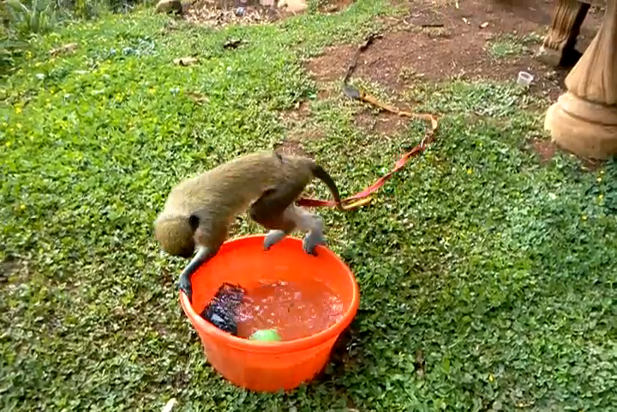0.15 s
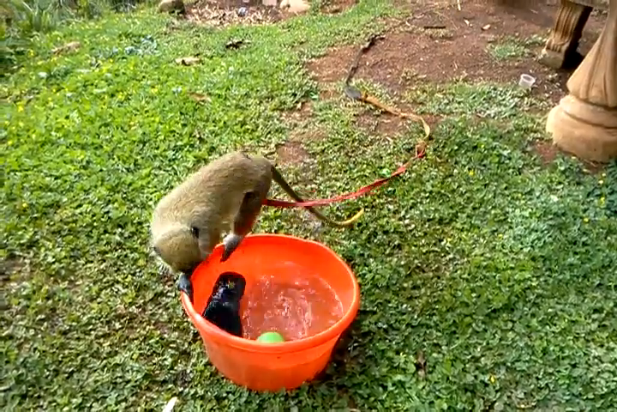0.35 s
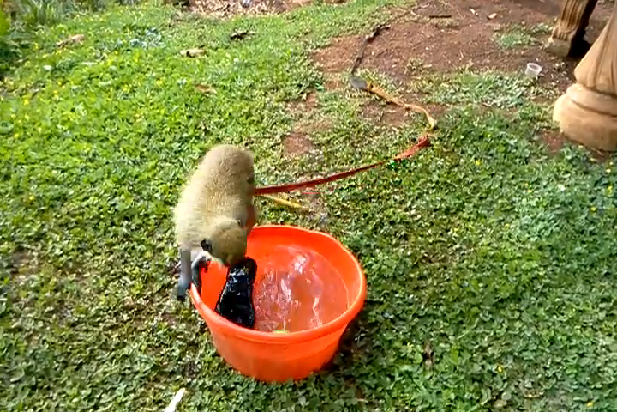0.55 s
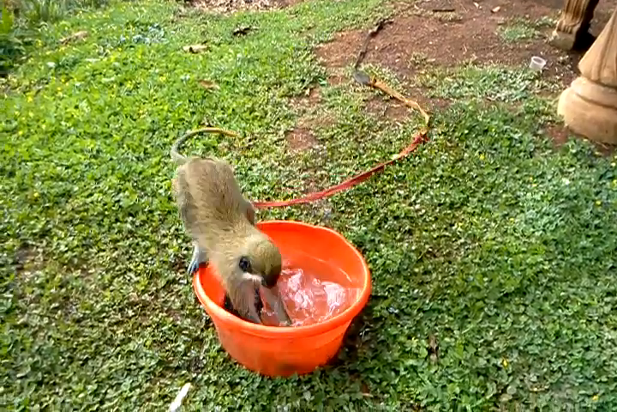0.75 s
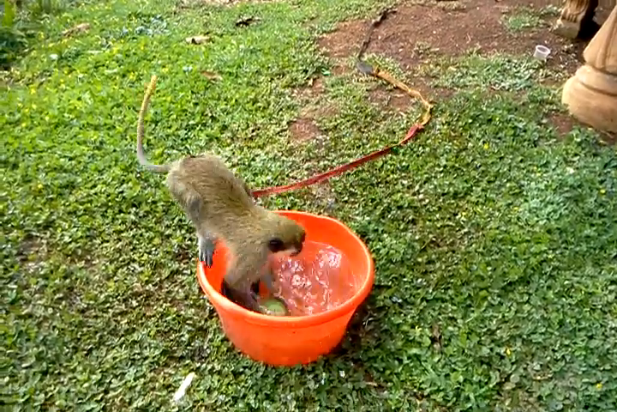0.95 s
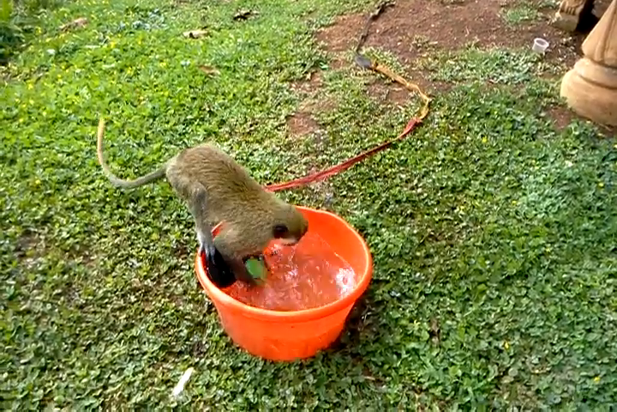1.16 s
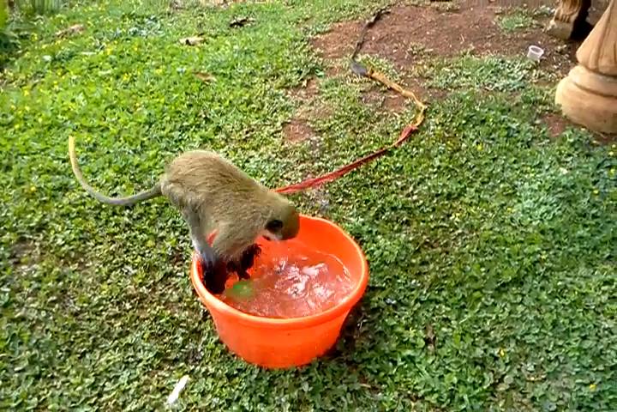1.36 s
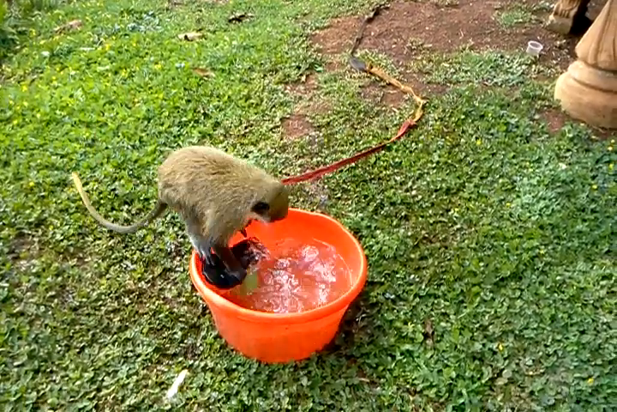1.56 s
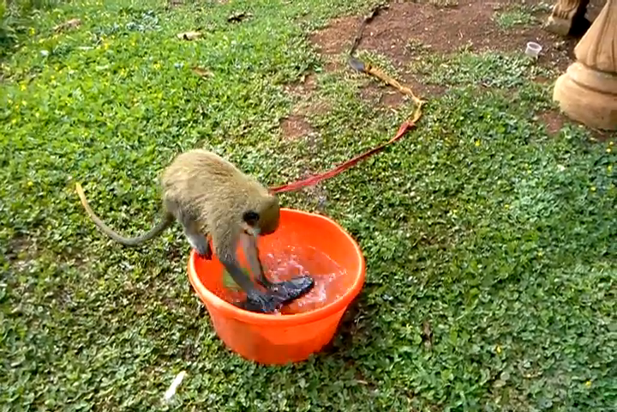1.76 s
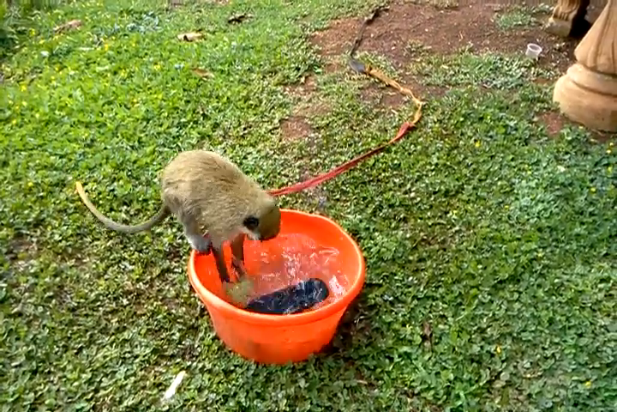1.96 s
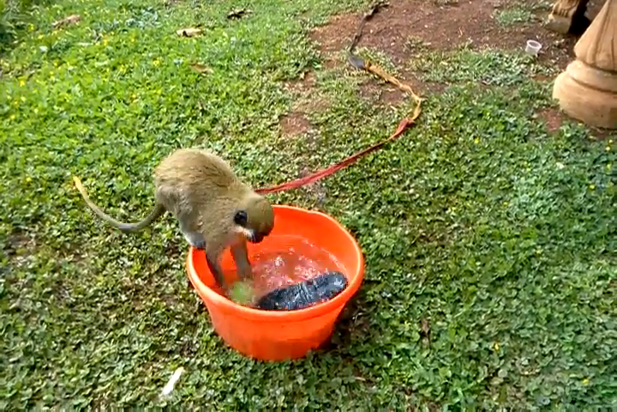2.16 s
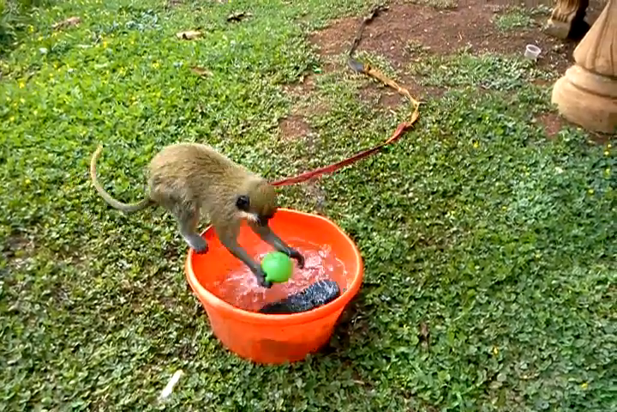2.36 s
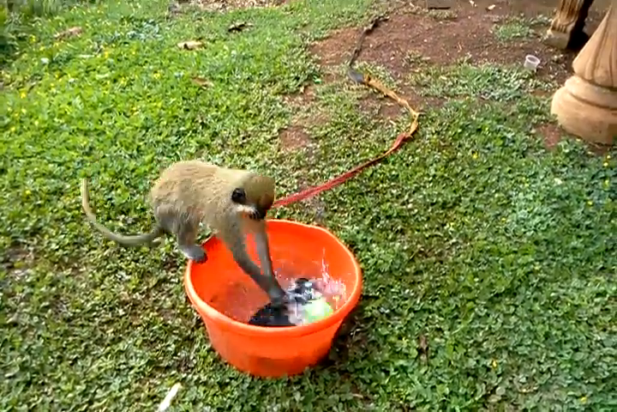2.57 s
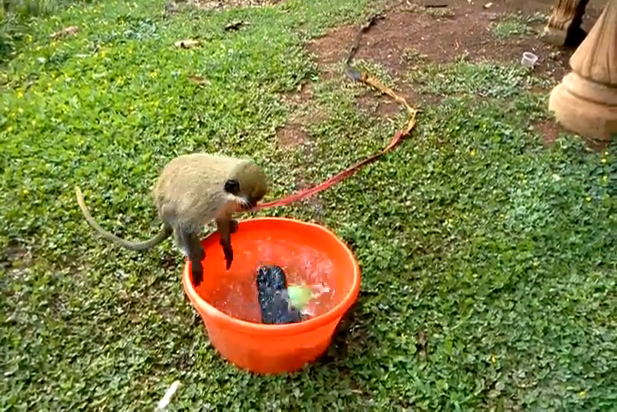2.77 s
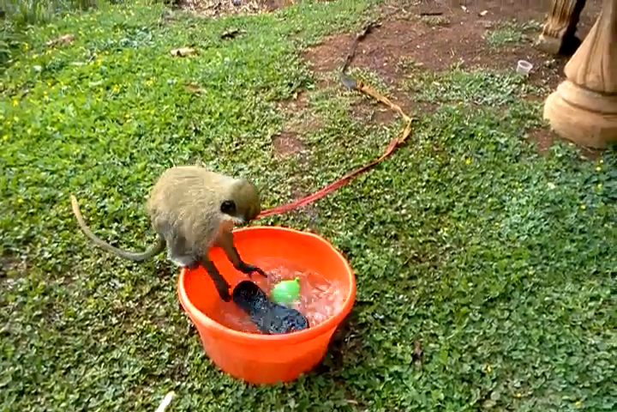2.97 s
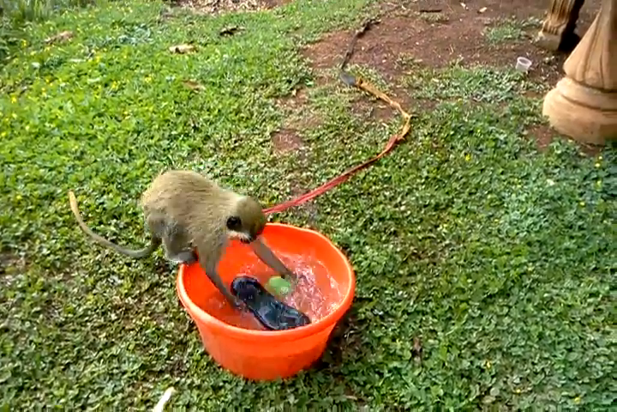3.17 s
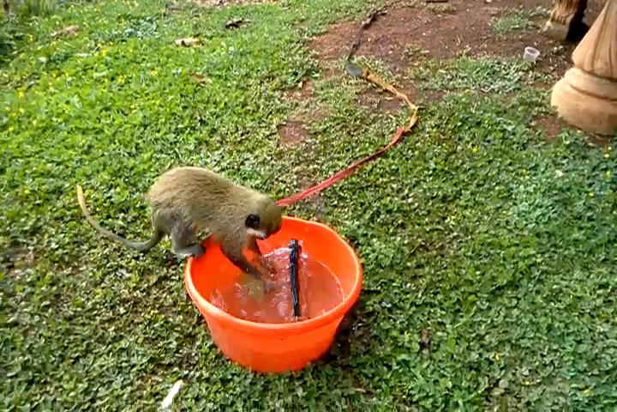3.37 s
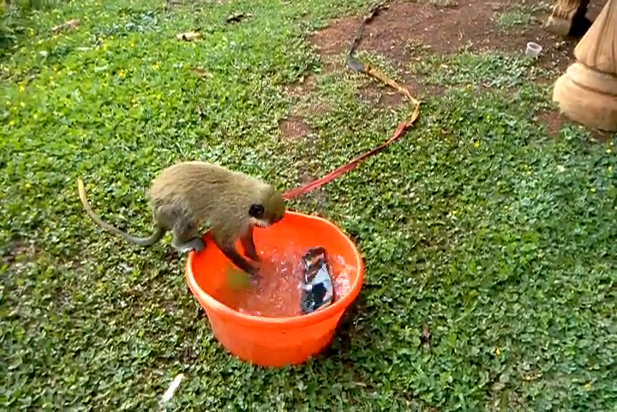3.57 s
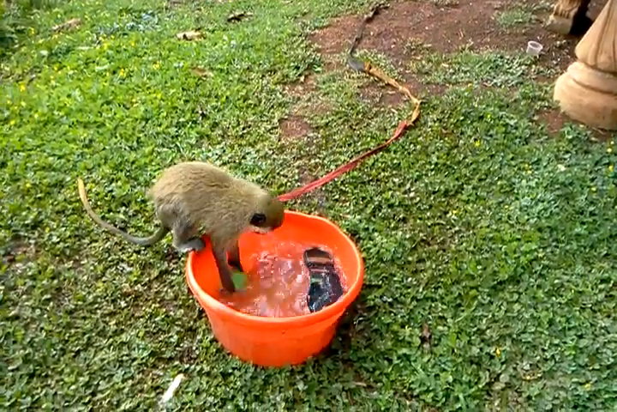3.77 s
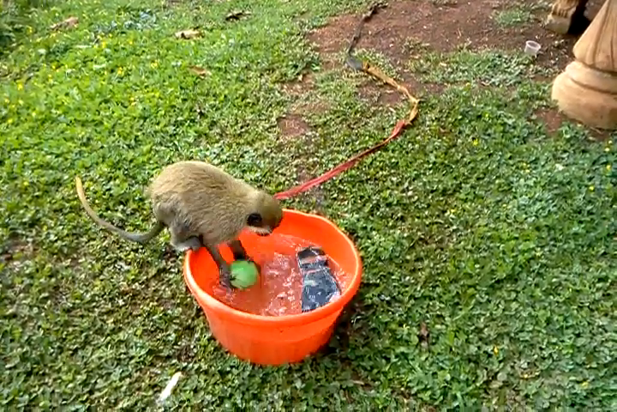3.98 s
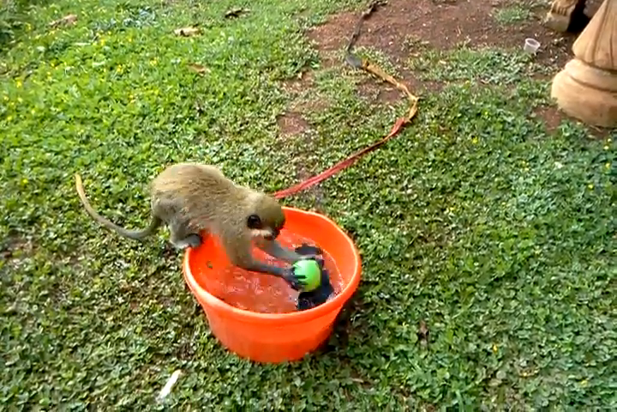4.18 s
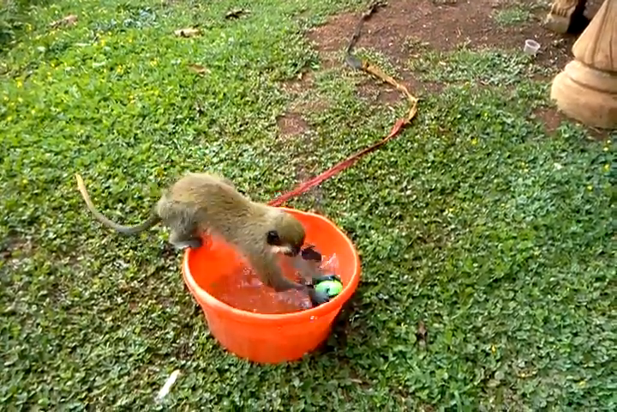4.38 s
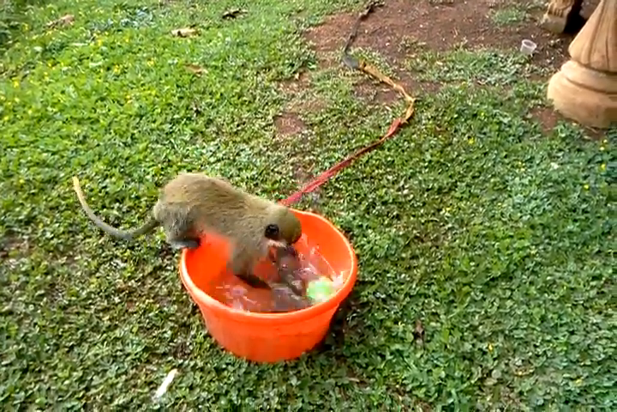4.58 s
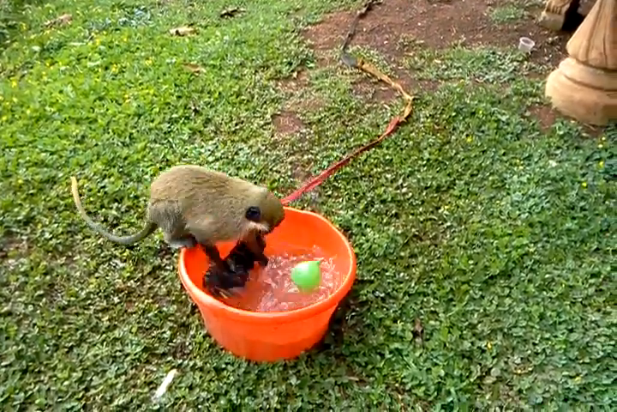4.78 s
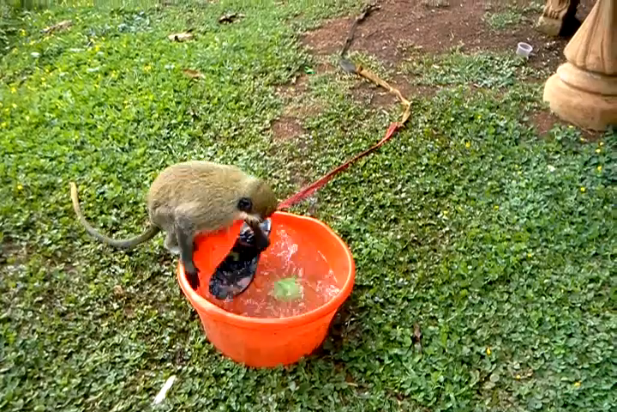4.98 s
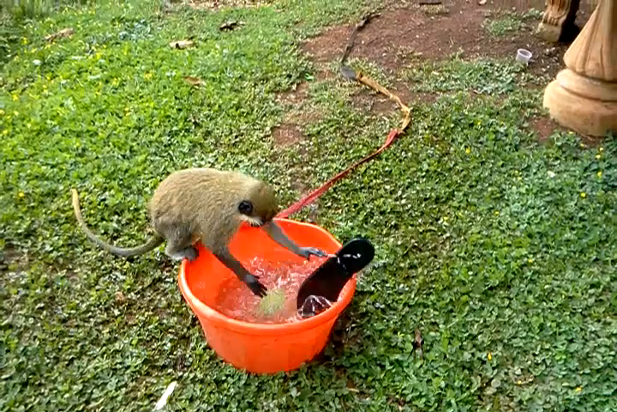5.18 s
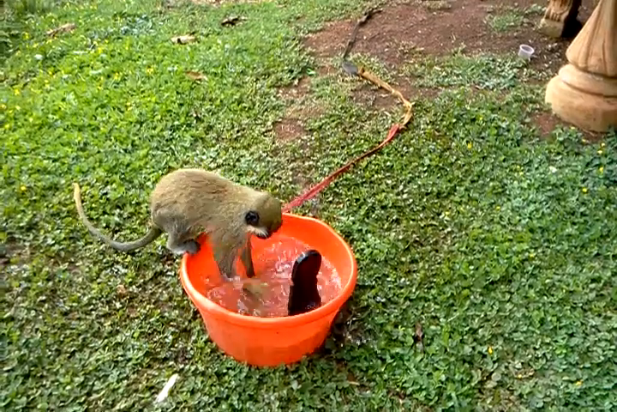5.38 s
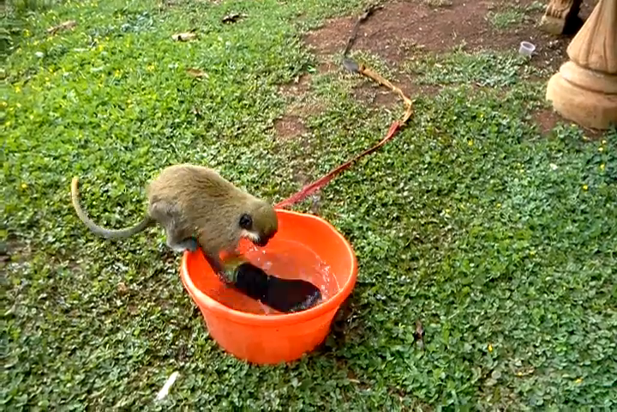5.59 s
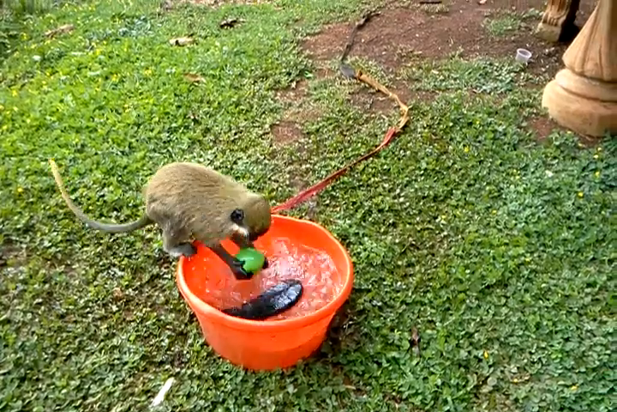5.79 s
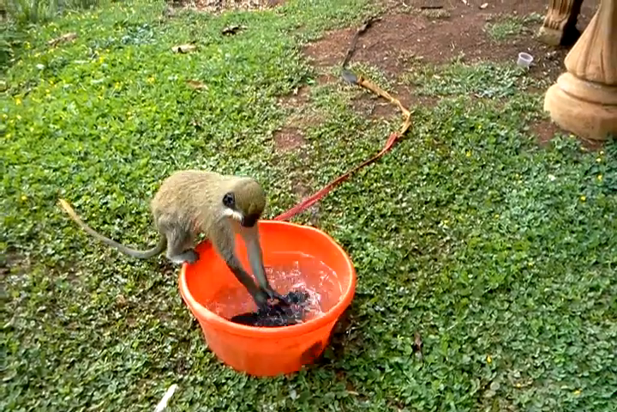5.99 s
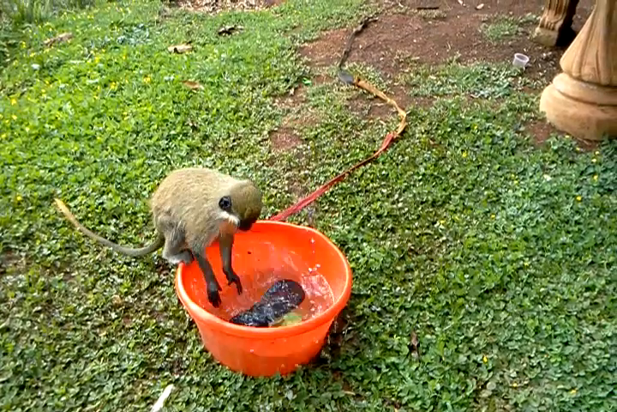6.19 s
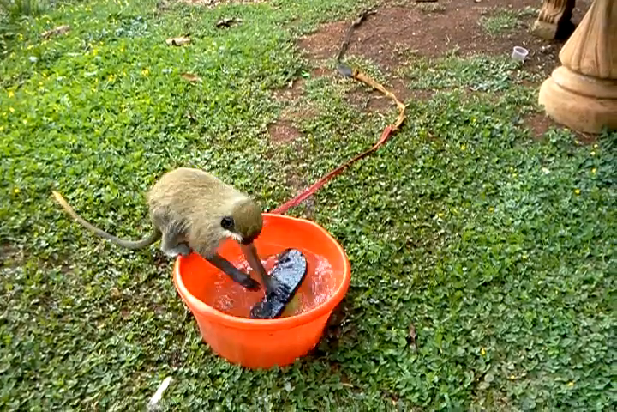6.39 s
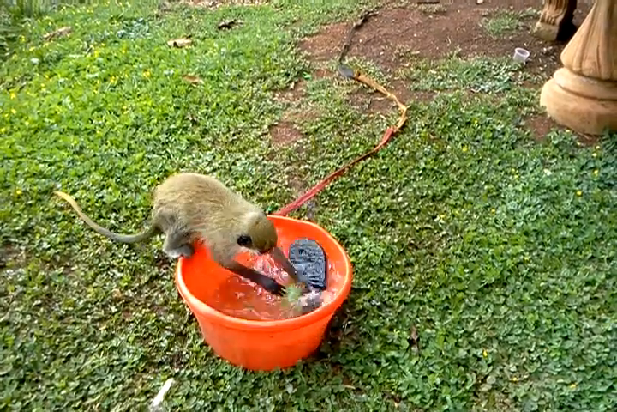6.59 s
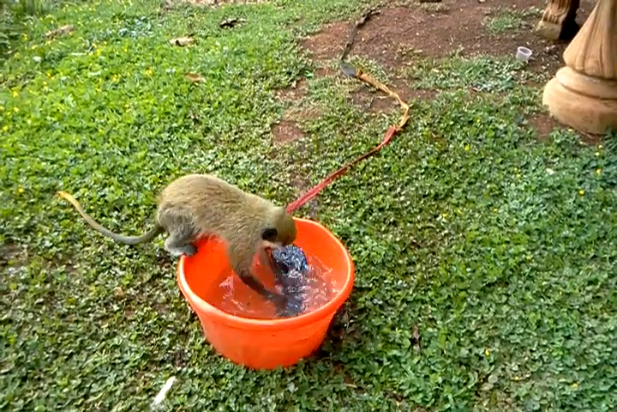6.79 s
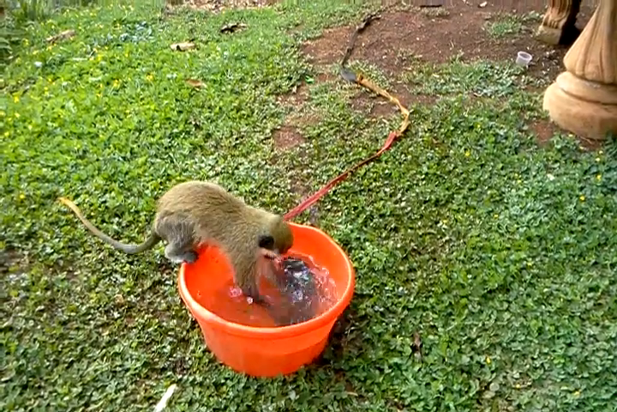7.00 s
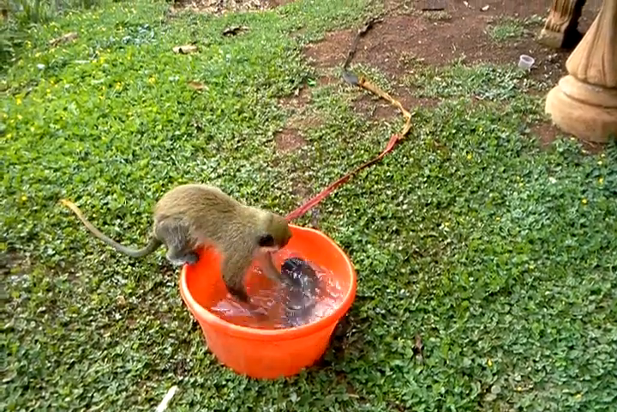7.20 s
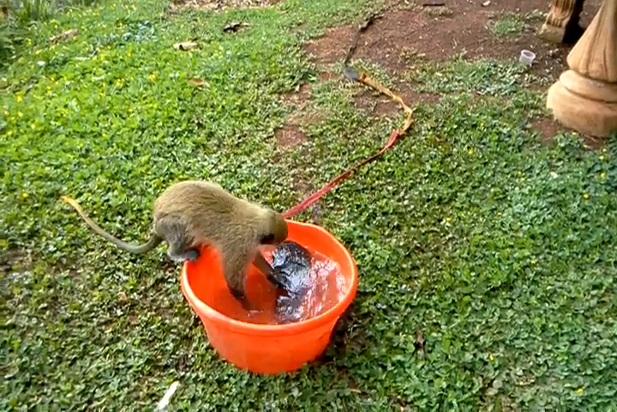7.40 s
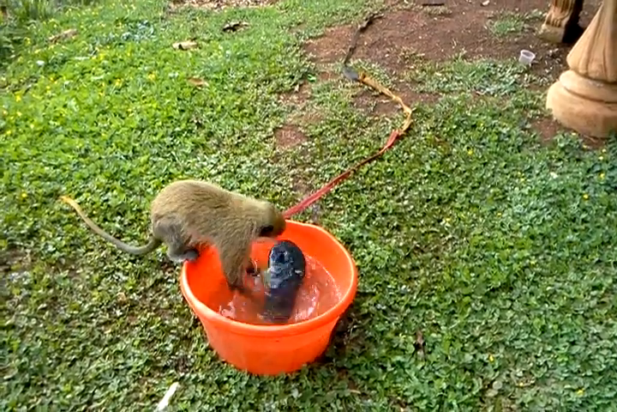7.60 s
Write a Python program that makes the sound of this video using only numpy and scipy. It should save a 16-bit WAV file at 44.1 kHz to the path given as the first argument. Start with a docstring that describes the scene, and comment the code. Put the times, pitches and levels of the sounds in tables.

```python
"""A far propeller plane swells in over garden hiss and a thin cricket: sinking tones and comb-swept noise.
From 0.7 s a small monkey paddles after a ball and a sandal in a plastic tub on a lawn: strokes throw
spray of tiny ringing bubbles, drops plink, trapped air gurgles up, and short echoes give the tub.
A long gust, shaped low noise with slow eddies, bumps the microphone from 2.7 s, with puffs around it.
The water settles after 6.9 s; near 7.5 s a far bird sounds one faint, wavering sine note."""
import sys
import numpy as np
from scipy import signal
from scipy.fft import rfft, irfft, next_fast_len
from scipy.io import wavfile

SR = 44100
rng = np.random.default_rng(int(sys.argv[2]) if len(sys.argv) > 2 else 0)


def dump(signal):
    """Clip the signal to [-1, 1] and save it as 16-bit WAV at the path in sys.argv[1]."""
    limited = np.clip(np.atleast_2d(signal).T, -1, 1)
    pcm = np.round(limited * 32767).astype(np.int16)
    wavfile.write(sys.argv[1], SR, pcm)


N = 337356

# Table levels stand ahead of the trims, wavering and tub echo applied in the functions.
# Paw strokes through the water: (time [s], length [s], spray level [dB])
PAW_STROKES = [(0.80, 0.055, -38), (0.895, 0.056, -36), (1.15, 0.028, -39), (1.345, 0.085, -37.5),
               (1.50, 0.041, -40.5), (1.725, 0.095, -39), (1.975, 0.073, -38), (2.425, 0.051, -37),
               (2.51, 0.135, -34.5), (2.69, 0.053, -39.5), (3.215, 0.028, -43), (3.305, 0.049, -40.5),
               (3.465, 0.028, -31.5), (4.22, 0.045, -38.5), (4.355, 0.14, -45), (4.615, 0.11, -39.5),
               (4.855, 0.19, -41), (5.10, 0.14, -40.5), (5.342, 0.023, -34), (5.405, 0.03, -33.5),
               (5.725, 0.045, -37.5), (5.89, 0.14, -38), (6.08, 0.043, -42.5), (6.49, 0.25, -44)]
# Loudest drops and slaps: (time [s], trapped bubble pitch [Hz], ring level [dB], spatter level [dB])
WATER_DROPS = [(0.8047, 6940, -41, -36), (0.8199, 4660, -31.5, -47), (0.909, 4580, -32, -33),
               (0.939, 4200, -33, -48), (1.0628, 3260, -32, -39), (1.1604, 5330, -37, -29.5),
               (1.1797, 4800, -36, -45.5), (1.3853, 3530, -20.5, -22.5), (1.548, 4880, -31.5, -44),
               (1.734, 5030, -32, -34), (1.7588, 4280, -32.5, -46), (1.7923, 5710, -38, -32),
               (1.8032, 3640, -34, -30), (1.9142, 4890, -18.5, -27), (2.0548, 3350, -33, -31),
               (2.164, 4340, -38, -38), (2.515, 4930, -30, -33.5), (2.539, 5120, -24.5, -34),
               (2.584, 4970, -25, -24.5), (2.6089, 5600, -36, -34.5), (2.7442, 4350, -44, -25),
               (3.2315, 5130, -33, -36), (3.3253, 4600, -28.5, -33), (3.3406, 5000, -29.5, -52),
               (3.4903, 5000, -48, -27), (3.547, 4930, -31, -32), (3.6786, 3960, -30.5, -30),
               (4.3627, 5260, -37, -32.5), (4.4504, 3420, -33, -54), (4.4994, 4400, -29.5, -34),
               (4.5285, 4970, -30.5, -42), (4.5898, 5640, -43, -31.5), (4.693, 3130, -35.5, -44),
               (4.859, 5300, -30, -37), (4.8898, 4850, -29, -40), (5.1075, 5160, -42, -32),
               (5.357, 4400, -30.5, -40.5), (5.4566, 5200, -33, -35.5), (5.483, 4700, -41, -38),
               (5.4965, 3710, -37, -28.5), (5.6233, 5000, -29, -37), (5.7648, 4730, -34, -46.5),
               (5.9588, 5030, -28, -33.5), (6.4124, 4670, -36, -34.5), (6.544, 4550, -33, -48),
               (6.7027, 3800, -38.5, -33), (6.85, 5300, -34, -36), (6.9453, 5240, -38, -34.5)]
# Largest air pockets: (time [s], pitch [Hz], level [dB], decay by 60 dB [s], time to rise an octave [s])
AIR_POCKETS = [(0.934, 375, -28, .035, .2), (0.937, 1910, -20.5, 0.0094, .1),
               (1.007, 2090, -26, 0.021, .04), (1.236, 1450, -26, .014, .1),
               (1.423, 1934, -29.5, 0.094, 0.27), (1.732, 1360, -29.5, .03, .1),
               (1.792, 1240, -18.5, 0.016, 0.092), (2.0465, 1810, -17, 0.0089, .1),
               (2.049, 1110, -27.5, 0.018, .1), (3.076, 777, -26.5, 0.2, 0.048),
               (3.285, 980, -26, 0.13, .2), (3.307, 990, -18, .012, .1), (3.308, 763, -27, 0.15, 0.26),
               (3.386, 1000, -24, 0.021, .1), (3.409, 890, -31.5, 0.053, .14),
               (3.444, 1550, -29, 0.038, .1), (3.4635, 1866, -18, 0.033, 0.02),
               (3.482, 1690, -21.5, 0.023, 0.021), (3.494, 775, -23.5, .024, .1),
               (4.0902, 1140, -22.5, 0.021, .11), (4.146, 1430, -29.5, .04, 0.082),
               (4.247, 1976, -31, 0.05, 0.087), (4.624, 277, -29.5, .05, .2), (4.666, 312, -28.5, .06, .2),
               (4.720, 894, -25.5, 0.036, .038), (4.8503, 1780, -12, 0.0065, .09),
               (4.853, 2250, -21, 0.026, .1), (4.918, 1146, -26.5, 0.028, .06),
               (4.973, 820, -31, 0.048, .1), (5.172, 2910, -24.5, .016, .1), (5.205, 1710, -30, 0.035, .03),
               (5.623, 2020, -25.5, 0.015, .14), (5.724, 1610, -30.5, 0.035, .1),
               (6.029, 1240, -27, 0.024, .08), (6.052, 860, -33, 0.037, .1),
               (6.136, 1890, -33, 0.05, 0.098), (6.181, 1500, -30.5, 0.031, .05),
               (6.515, 353, -33, 0.055, .2)]
# Trapped air escaping from under the toys: (time [s], length [s], relative flow [dB])
AIR_ESCAPES = [(0.9, 1.9, -13.5), (3.27, 0.23, 3), (4.08, 0.2, -6.5), (4.6, 0.4, -4.5), (5.35, 0.85, -10.5)]
# Colour of the splashing water: (frequency [Hz], relative level per Hz [dB])
SPRAY_SPECTRUM = [(300, -13.5), (700, -14.5), (1300, -6.5), (1950, -1), (2500, -9.5), (3400, 3),
                  (4100, -2.5), (4950, 4), (6000, -5.5), (7300, -5.5), (8600, -27.5)]
# Propeller tones: (time [s], blade pitch [Hz], blade level [dB], shaft tone an octave below [dB],
# first overtone [dB])
PROPELLER = [(0, 108.3, -63, -52, -55.5), (0.5, 108.2, -54.5, -62, -65), (1.1, 107.9, -43.5, -54, -53),
             (2.0, 106.7, -40, -46, -68), (2.8, 105.2, -39.5, -49, -56), (3.5, 102.7, -38.5, -51, -56),
             (4.0, 100.3, -46, -59, -45.5), (4.7, 96.4, -39, -53, -65), (5.6, 91.4, -42, -66, -65),
             (6.2, 88.8, -40.5, -69, -60), (6.75, 86.6, -37, -51, -54.5), (7.65, 82.7, -38.5, -51, -62)]
# Plane's rush: (time [s], level [dB], treble lift [dB], delay of the ground echo [ms])
PLANE_RUSH = [(0, -47.5, -2.5, 2.95), (0.7, -46, -1.5, 3.4), (1.2, -43, 2.5, 2.1), (2.2, -42, -2.5, 2.7),
              (2.9, -42.5, -4.5, 3.0), (3.8, -41.5, -2.5, 3.1), (4.6, -39.5, -2.5, 3.7),
              (5.1, -40, -7, 3.5), (5.7, -45.5, -4, 3.8), (6.5, -46, -6, 3.1), (7.65, -46, -10.5, 3.0)]
# Colour of the plane's rush: (frequency [Hz], relative level per Hz [dB])
RUSH_SPECTRUM = [(60, -26.5), (150, -3.5), (280, 1), (550, 1), (1000, 0.5), (1500, -7), (2500, -12.5),
                 (5000, -55)]
# One long gust and a few puffs on the microphone: (time [s], length [s], level [dB])
WIND_GUSTS = [(1.60, 0.039, -38.5), (1.89, 0.06, -53), (2.74, 1.42, -39), (3.37, 0.048, -29),
              (3.76, 0.072, -36), (5.18, 0.087, -49), (5.98, 0.14, -42), (6.71, 0.067, -45),
              (7.14, 0.06, -44), (7.50, 0.16, -43)]
# Strongest eddies: (time [s], pitch [Hz], level before their envelope [dB])
WIND_EDDIES = [(2.763, 106, -24), (3.069, 87, -28), (3.287, 124, -21), (3.375, 123, -20.5),
               (3.404, 58.7, -21.5), (3.503, 170, -28.5), (3.528, 149, -26.5)]
# Colour of the wind: (frequency [Hz], relative level per Hz [dB])
WIND_SPECTRUM = [(15, 1.5), (35, 8.5), (65, 1.5), (100, -1), (160, -13.5), (250, -8.5), (600, -69)]
# Garden air: (time [s], level [dB])
AIR_LEVEL = [(0, -44.5), (0.7, -45.5), (1.3, -43), (7.65, -42)]
# Colour of the garden air: (frequency [Hz], relative level per Hz [dB])
AIR_SPECTRUM = [(100, 1), (600, -2.5), (1500, -2.5), (2400, -4.5), (3500, -1.5), (4400, 0.5), (5000, 5),
                (5500, -0.5), (6100, -5), (7200, -9), (8000, -14.5), (9000, -39)]

STROKE_ATTACK_S, STROKE_RELEASE_S = 0.005, 0.016
# the stirred water trickles between strokes
PLAY_START_S, PLAY_END_S, SETTLE_S, TRICKLE_DB = 0.69, 6.9, 0.2, -48.5
# the surface breaks just before each slap; spray level is relative to that slap's spatter
ENTRY_LEAD_S, ENTRY_S, ENTRY_DB = 0.008, 0.0099, -9
GURGLE_FADE_S = 0.02
GUST_ATTACK_S, GUST_RELEASE_S, BREEZE_DB = 0.019, 0.049, -54.5
CHIRPS_PER_S, FIRST_CHIRP_S = 9.42, 0.062
CRICKET_HZ, CRICKET_DB = 6530, -59
CUTOFF_HZ = 8800


def from_db(db):
    """Decibels to amplitude gain."""
    return 10 ** (np.asarray(db) / 20)


def rms_one(x):
    """Scale to unit power."""
    return x / np.sqrt(np.mean(x ** 2) + 1e-20)


def in_time(rows):
    """Draw each column of a table as a curve, sample by sample."""
    s, *columns = np.transpose(rows)
    return [np.interp(np.arange(N) / SR, s, column) for column in columns]


def gain_at(spectrum, hz):
    """Read a spectrum's gain on a log-frequency axis."""
    points, db = np.transpose(spectrum)
    return from_db(np.interp(np.log(hz + 1e-9), np.log(points), db))


def noise(spectrum):
    """Steady noise of a given colour, rms 1."""
    size = next_fast_len(N)
    hz = np.arange(size // 2 + 1) * SR / size
    white = rfft(rng.standard_normal(size))
    return rms_one(irfft(white * gain_at(spectrum, hz), size)[:N])


def drift(rate):
    """A random wander of rms 1 through `rate` new points a second."""
    knots = np.arange(N) / SR * rate
    return rms_one(np.interp(knots, np.arange(N), rng.standard_normal(N)))


def add(track, s, sound):
    """Mix a short sound in at a given time."""
    start = max(round(s * SR), 0)
    track[start:start + len(sound)] += sound[:max(N - start, 0)]


def strike(age, swell_s, t60):
    """A quick swell and an exponential decay, 60 dB down in t60 seconds."""
    return (1 - np.exp(-age / swell_s)) * np.exp(-np.log(1000) * age / t60)


def swells(rows, attack_s, release_s):
    """Gain of overlapping swells: each rises, holds and dies away; their powers add."""
    power = np.zeros(N)
    for s, length_s, db in rows:
        age = np.arange(int((length_s + 10 * release_s) * SR)) / SR
        rise = np.minimum(age / attack_s, 1)
        release = np.exp(-np.maximum(age - length_s, 0) / release_s)
        add(power, s, (from_db(db) * rise * release) ** 2)
    return np.sqrt(power)


def stirring():
    """How hard the water is thrown about: strokes and slaps over a trickle lasting as long as the play."""
    play = [(PLAY_START_S, PLAY_END_S - PLAY_START_S, TRICKLE_DB)]
    trickle = swells(play, STROKE_ATTACK_S, SETTLE_S)
    strokes = swells(PAW_STROKES, STROKE_ATTACK_S, STROKE_RELEASE_S)
    slaps = [(s - ENTRY_LEAD_S, ENTRY_S, spatter_db + ENTRY_DB) for s, _, _, spatter_db in WATER_DROPS]
    entries = swells(slaps, attack_s=0.0067, release_s=0.0083)
    return np.sqrt(trickle ** 2 + strokes ** 2 + entries ** 2)


def spray(level, per_s, size_db, t60, clump_db, grain_db, fizz_db, count=16000):
    """Tiny bubbles ring in clumps over a fine fizz; harder splashing makes more and louder ones."""
    clumps = rms_one(from_db(clump_db * np.clip(drift(140), -2, 2)))
    vigour = np.sqrt(level / level.max() * clumps)
    when, chance, pitch, size, damping = rng.random((count, 5)).T
    start = (when * N).astype(int)
    born = chance < vigour[start] * per_s * N / SR / count
    # one row per bubble, one column per sample of its life
    start = start[born, None]
    hz = 700 * (8400 / 700) ** np.sqrt(pitch[born, None])
    # most bubbles are faint, a few stand out
    height = vigour[start] * gain_at(SPRAY_SPECTRUM, hz) * from_db(size_db * size[born, None] ** 3)
    age = np.arange(SR // 70) / SR
    decay = strike(age, 1 / hz, t60 * (.5 + damping[born, None]))
    rings = height * np.sin(2 * np.pi * hz * age) * decay
    places = start + np.arange(len(age))
    grains = np.bincount(places.ravel(), rings.ravel(), N)[:N]
    grains = rms_one(grains) * np.sqrt(np.mean(level ** 2))
    fizz = level * clumps * noise(SPRAY_SPECTRUM)
    return from_db(grain_db) * grains + from_db(fizz_db) * fizz


def drops(ring_cycles, swell_s, spatter_swell_s, spatter_t60, ring_db, spatter_db):
    """Each impact spatters and pinches off a ringing bubble; levels are set over the first 6 ms."""
    age, head = np.arange(SR // 20) / SR, round(.006 * SR)
    out, spatter = np.zeros(N), noise(SPRAY_SPECTRUM)
    for k, (s, hz, bubble_db, impact_db) in enumerate(WATER_DROPS):
        plink = np.sin(2 * np.pi * hz * age) * strike(age, swell_s, ring_cycles / hz)
        piece = spatter[k * len(age):(k + 1) * len(age)]
        burst = piece * strike(age, spatter_swell_s, spatter_t60)
        add(out, s, from_db(bubble_db + ring_db) * plink / np.std(plink[:head]))
        add(out, s, from_db(impact_db + spatter_db) * burst / np.std(burst[:head]))
    return out


def bubbles(swell_s, level_db, shed_db, shed_octaves, shed_cycles, count=6):
    """An air pocket rings, climbs in pitch as it nears the surface, and sheds short-lived companions."""
    out, age = np.zeros(N), np.arange(SR // 10) / SR
    for s, hz, peak_db, t60, octave_s in AIR_POCKETS:
        rise = np.minimum(age / octave_s, 2) ** 2
        surfacing = np.exp(-(rise / 1.6) ** 4)   # the ring is cut off at the surface
        ring = np.sin(2 * np.pi * np.cumsum(hz * (1 + rise)) / SR)
        add(out, s, from_db(peak_db) * ring * strike(age, swell_s, t60) * surfacing)
        for when, size in rng.random((count, 2)):
            shed_hz = hz * 2 ** (shed_octaves * (2 * size - 1))
            shed = np.sin(2 * np.pi * shed_hz * age) * strike(age, swell_s, shed_cycles / shed_hz)
            shed_s = s + (.3 + when) * min(t60, .025)
            add(out, shed_s, from_db(peak_db + shed_db) * (1 - .5 * when) * shed)   # later ones are softer
    return from_db(level_db) * out


def gurgle(flow, low_hz, high_hz, peak_db, spread_db, cycles, octave_s, count):
    """Lesser bubbles ring at random, most often while air flows strongly, each rising in pitch."""
    out, age = np.zeros(N), np.arange(SR // 20) / SR
    escaped = np.cumsum(flow) / np.sum(flow)
    for k, (when, pitch, size) in enumerate(rng.random((count, 3))):
        hz = low_hz * (high_hz / low_hz) ** pitch
        phase = 2 * np.pi * hz * np.cumsum(1 + age / octave_s) / SR
        ring = np.sin(phase) * strike(age, 1 / hz, cycles / hz)
        s = np.searchsorted(escaped, (k + when) / count) / SR   # an even share of the air per bubble
        add(out, s, from_db(peak_db - spread_db * size) * ring)
    return out


def tub(water, echo_db, t60, wall_hz, count=40):
    """Sound bounces between the plastic walls and the water surface and dies quickly."""
    lags, echoes = rng.uniform(0.001469, 0.038, count), np.zeros(SR // 10)
    decay = np.exp(-np.log(1000) * lags / t60)
    echoes[(lags * SR).astype(int)] = rng.choice([-1, 1], count) * decay
    dulling = signal.butter(1, wall_hz, fs=SR, output="sos")
    walls = signal.sosfilt(dulling, echoes / np.linalg.norm(echoes))
    return water + from_db(echo_db) * signal.fftconvolve(water, walls)[:N]


def plane(ground_share, waver_db, churn_db, third_db, treble_hz):
    """Blade tones sink and the rush dulls as the plane passes; the ground echo sweeps a comb through it."""
    hz, blade_db, shaft_db, overtone_db = in_time(PROPELLER)
    rush_db, treble_db, echo_ms = in_time(PLANE_RUSH)
    phase = 2 * np.pi * np.cumsum(hz) / SR
    # multiples of the blade pitch and their levels
    orders = [(.5, shaft_db), (1, blade_db), (2, overtone_db), (3, overtone_db + third_db)]
    drone = sum(from_db(db + waver_db * drift(6)) * np.sin(k * phase) for k, db in orders)
    rush, samples = noise(RUSH_SPECTRUM), np.arange(N)
    ground_echo = np.interp(samples - echo_ms * SR / 1000, samples, rush)
    rush = rms_one(rush + ground_share * ground_echo)
    low = signal.sosfiltfilt(signal.butter(3, treble_hz, fs=SR, output="sos"), rush)
    shaded = low + from_db(treble_db) * (rush - low)
    return drone + from_db(rush_db + churn_db * drift(12)) * shaded


def wind(level_db, lump_db, eddy_cycles):
    """Lumpy low pressure on the microphone port, with a few stronger eddies."""
    flow = np.hypot(swells(WIND_GUSTS, GUST_ATTACK_S, GUST_RELEASE_S), from_db(BREEZE_DB))
    out = flow * from_db(level_db + lump_db * drift(22)) * noise(WIND_SPECTRUM)
    for s, hz, eddy_db in WIND_EDDIES:
        turn = (np.arange(N) / SR - s) * hz
        bell = np.exp(-np.minimum((turn / eddy_cycles) ** 2, 50))
        out -= from_db(eddy_db) * np.sin(2 * np.pi * turn) * bell
    return out


def cricket(chirp_sharpness, uneven_db, wander_hz):
    """A thin, slightly wandering high tone pulsed into evenly spaced chirps."""
    tone = np.sin(2 * np.pi * np.cumsum(CRICKET_HZ + wander_hz * drift(120)) / SR)
    beat = np.pi * CHIRPS_PER_S * (np.arange(N) / SR - FIRST_CHIRP_S)
    chirps = np.abs(np.cos(beat)) ** chirp_sharpness
    return from_db(CRICKET_DB + uneven_db * drift(3.9)) * rms_one(chirps * tone)


def far_bird(start_s, length_s, pitch_hz, peak_db, fade_s, wander_hz):
    """One faint, nearly level note from far across the garden."""
    tone = np.sin(2 * np.pi * np.cumsum(pitch_hz + wander_hz * drift(40)) / SR)
    return swells([(start_s, length_s, peak_db)], fade_s, fade_s) * tone


def open_air():
    """Even hiss of the garden: coloured noise on a slow level curve."""
    return from_db(in_time(AIR_LEVEL)[0]) * noise(AIR_SPECTRUM)


def scene():
    """The water in its tub, with the sky, the wind and the garden around it."""
    level = stirring()
    air_flow = swells(AIR_ESCAPES, GURGLE_FADE_S, GURGLE_FADE_S)
    water = spray(level, per_s=1300, size_db=13.5, t60=0.0091, clump_db=4.0, grain_db=-4.0, fizz_db=-4.5)
    water += drops(ring_cycles=16.6, swell_s=0.00061, spatter_swell_s=0.0009, spatter_t60=0.013,
                   ring_db=-0.25, spatter_db=-1.05)
    water += bubbles(swell_s=0.00018, level_db=-0.16, shed_db=-6.5, shed_octaves=0.99, shed_cycles=7.1)
    water += gurgle(air_flow, low_hz=537, high_hz=2590, peak_db=-30.5, spread_db=10.5,
                    cycles=14, octave_s=0.095, count=140)
    mix = tub(water, echo_db=-10.5, t60=0.05, wall_hz=7000)
    mix += plane(ground_share=0.091, waver_db=1.0, churn_db=1.0, third_db=-10.5, treble_hz=634)
    mix += wind(level_db=-0.5, lump_db=3.0, eddy_cycles=0.52)
    mix += cricket(chirp_sharpness=2.6, uneven_db=-0.5, wander_hz=40.1)
    mix += far_bird(start_s=7.46, length_s=.1, pitch_hz=2050, peak_db=-52, fade_s=.025, wander_hz=16)
    mix += open_air()
    return mix[None]


def record(dry):
    """A small camera: the deepest rumble is rolled off and the top is cut steeply."""
    dry = signal.sosfilt(signal.butter(2, 18, "high", fs=SR, output="sos"), dry)
    return signal.sosfilt(signal.ellip(10, .3, 80, CUTOFF_HZ, fs=SR, output="sos"), dry)


dry = scene()
out = record(dry)
dump(out)
```